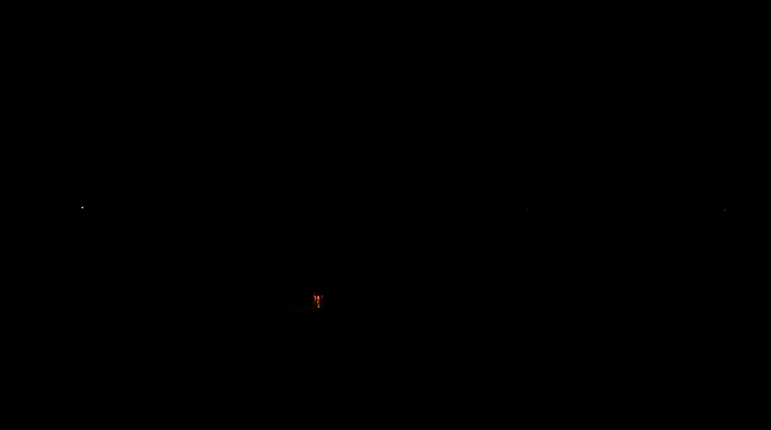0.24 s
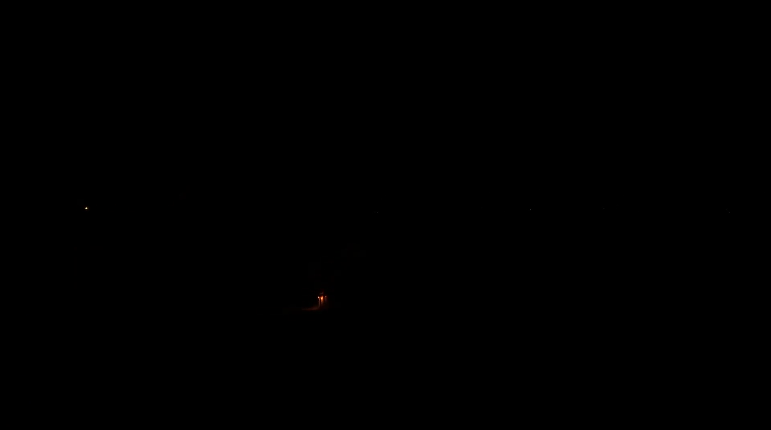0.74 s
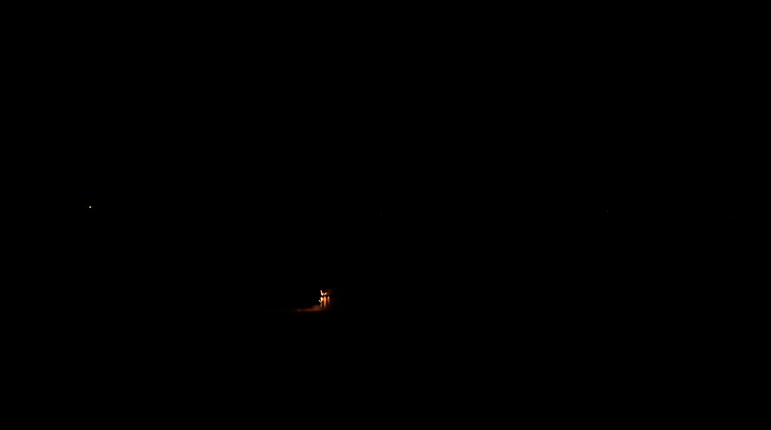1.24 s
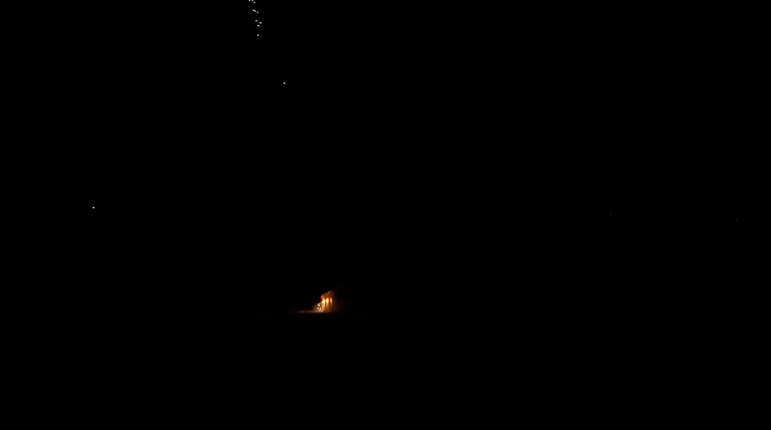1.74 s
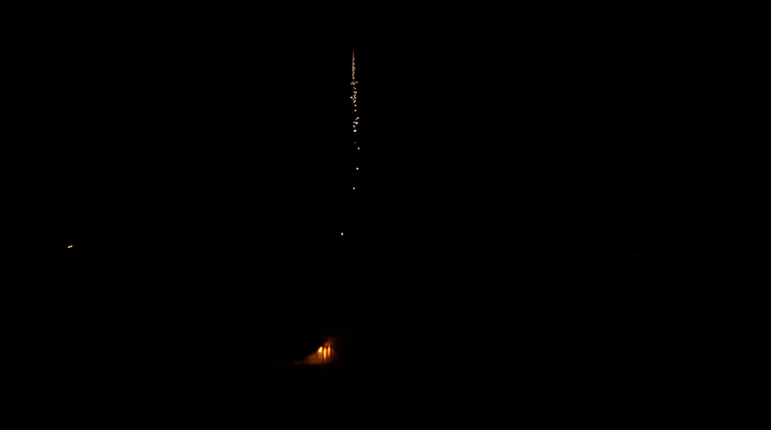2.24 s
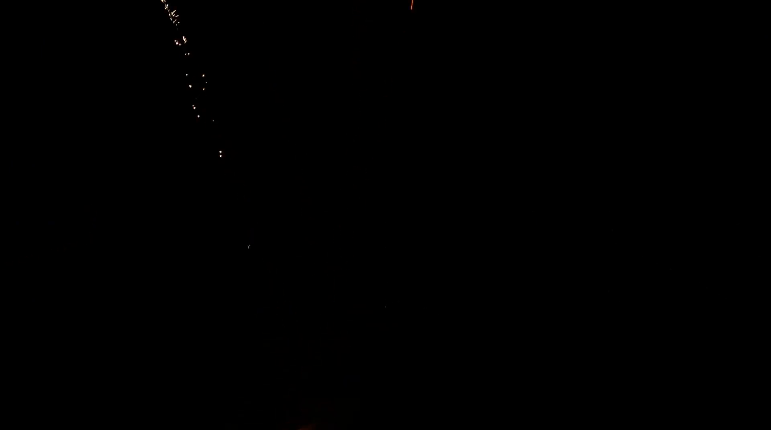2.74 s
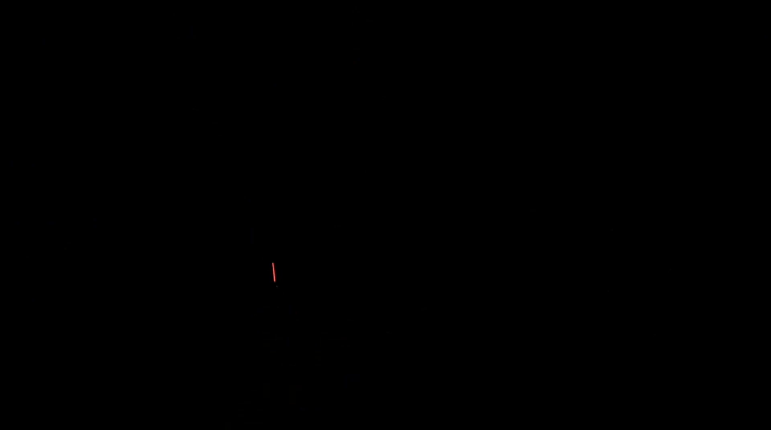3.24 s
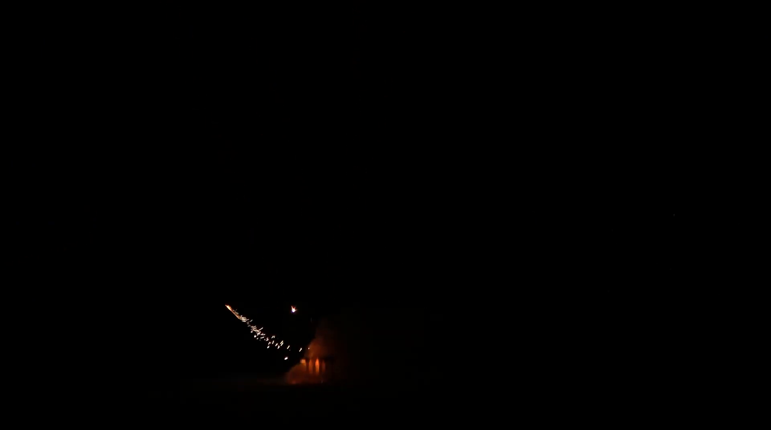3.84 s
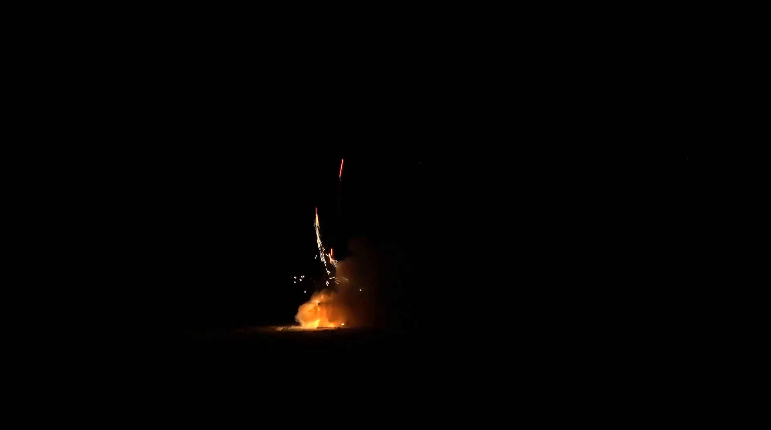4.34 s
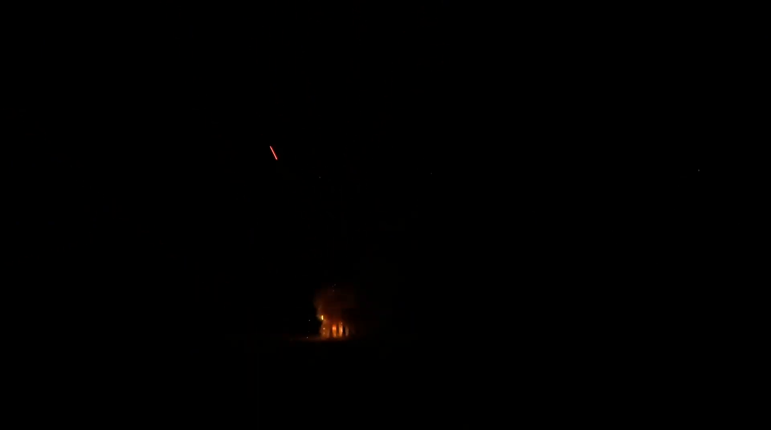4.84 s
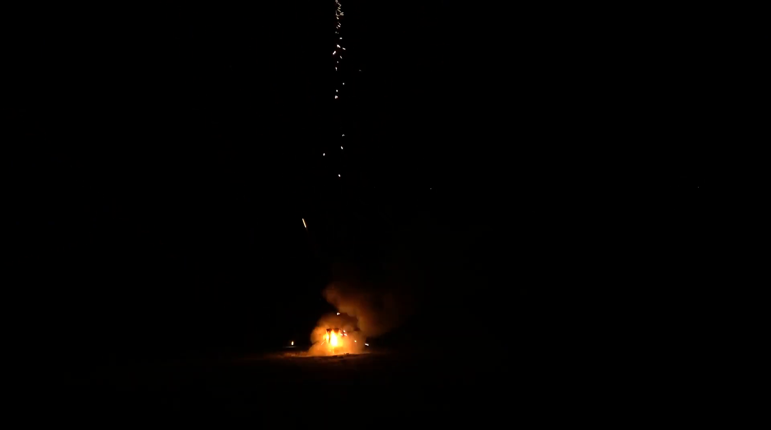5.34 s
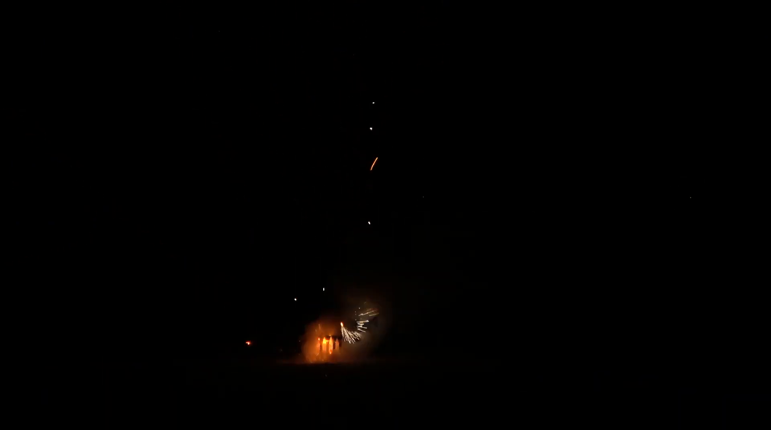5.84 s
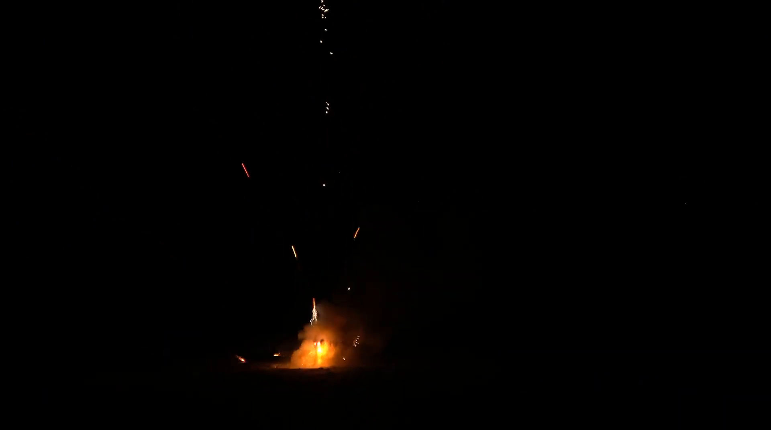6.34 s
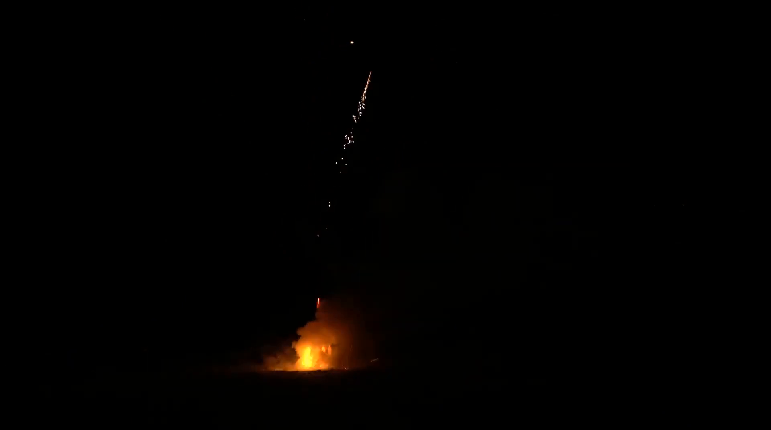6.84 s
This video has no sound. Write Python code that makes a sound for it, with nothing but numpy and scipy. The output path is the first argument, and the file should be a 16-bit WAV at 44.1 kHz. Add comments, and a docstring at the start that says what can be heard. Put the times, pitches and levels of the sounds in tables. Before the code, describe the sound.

In a quiet open field at night, one small rocket ignites with a puff and a piercing whistle that climbs briefly and sinks. A second follows, then launches pile into a shrill, detuned swarm with sizzling exhaust. Sharp cracks begin after two seconds and become frequent, with short ground bounces and sparse echoes. The microphones stand at some distance, with loud peaks pressed down.

```python
"""An open field at night: small whistling rockets fire, first one, then dozens at once.
Each whistle is a stack of partials that sputters alight and sinks in pitch as its tube burns hollow;
farther ones form a swarm, and the jets are coloured noise with spitting grains.
The rockets burst overhead in sharp cracks, built from a shock pulse, a snap and a thump.
Sparse echoes return from the ground, and a limiter after the microphones pushes down loud peaks."""
import sys
import numpy as np
from scipy import signal
from scipy.fft import rfft, irfft
from scipy.io import wavfile
from scipy.ndimage import uniform_filter1d, minimum_filter1d

SR = 44100
rng = np.random.default_rng(int(sys.argv[2]) if len(sys.argv) > 2 else 0)


def transcribe(signal):
    """Save signal, clipped to [-1, 1], as a 16-bit WAV file at the path in sys.argv[1]."""
    frames = np.atleast_2d(signal).T
    limited = np.clip(frames, -1, 1)
    pcm = np.round(limited * 32767).astype(np.int16)
    wavfile.write(sys.argv[1], SR, pcm)


N = 312228
TIME = np.arange(N) / SR

# How the volley thickens, levels relative before the final mix:
# (time [s], jet hiss [dB], overtone strength [dB], swarm of farther whistles [dB])
VOLLEY = [(.14, -40, -1, -81), (.5, -36, -11, -91), (1.02, -35, -13.5, -87), (1.3, -42.5, -1.5, -29.5),
          (1.65, -27, 0, -29.5), (2.3, -31.5, -1, -24.5), (2.5, -22.5, 7.5, -23.5), (3.0, -22.5, 1, -21.5),
          (3.5, -24, 3.5, -19.5), (5.6, -24, 1, -20), (6.4, -25, 2, -16.5), (7.08, -22.5, 0, -20)]


def gain_of(db):
    """Decibels to amplitude."""
    return 10 ** (np.asarray(db) / 20)


def evened(x):
    """Scales to rms 1."""
    return x / np.sqrt(np.mean(x ** 2) + 1e-20)


def read(points, hz):
    """Reads a spectrum table on a log-frequency axis."""
    table_hz, value = np.transpose(points)
    return np.interp(np.log(hz + 1), np.log(table_hz + 1), value)


def follow(rows, t):
    """The columns of a curve table at times t."""
    s, *columns = np.transpose(rows)
    return [np.interp(t, s, column) for column in columns]


def add(mix, s, sound):
    """Mixes a sound in at time s."""
    part = mix[max(round(s * SR), 0):][:len(sound)]
    part += sound[:len(part)]


def tint(x, spectrum):
    """Filters by a spectrum table."""
    gain = gain_of(read(spectrum, np.fft.rfftfreq(N, 1 / SR)))
    return irfft(rfft(x) * gain, N)


def noise(spectrum):
    """Noise of the given colour, at rms 1."""
    return evened(tint(rng.standard_normal(N), spectrum))


def wander(t, hz):
    """A random unsteadiness: straight lines between normal draws, hz of them a second."""
    return np.interp((t - t[0]) * hz, np.arange(8192), rng.standard_normal(8192))


def band(x, low_hz, high_hz):
    """A gentle band-pass."""
    edges_hz = [low_hz, min(high_hz, .45 * SR)]
    return signal.sosfilt(signal.butter(2, edges_hz, "band", fs=SR, output="sos"), x)


def night(level_db=-50.5):
    """The quiet night air: steady noise, weighted to the lows."""
    # Spectrum of the night: (frequency [Hz], relative level [dB])
    night_spectrum = [(25, -6), (130, 0), (600, -11), (3000, -17), (15000, -42)]
    return gain_of(level_db) * noise(night_spectrum)


def field(x, echoes_per_s=2000, build=0.0037):
    """Sparse echoes from the ground and things around, each band dying at its own speed."""
    # Echo decay of the field: (frequency [Hz], time to fall 60 dB [s])
    field_decay = [(200, 0.077), (2500, 1), (15000, 0.75)]
    taps = rng.standard_normal((2, SR)) * (rng.random((2, SR)) < echoes_per_s / SR)
    hz, t, z = signal.stft(taps, SR, nperseg=256)
    decay = gain_of(-60 * t / read(field_decay, hz)[:, None])
    onset = 1 - np.exp(-t / build)  # build in s
    tail = signal.istft(z * decay * onset, SR, nperseg=256)[1]
    tail = tail / np.linalg.norm(tail[0])
    mid, side = signal.fftconvolve(x[None], tail, axes=1)[:, :N]
    spread = 0.1 * side + .5 * band(side, 300, 490)  # the low echoes come from all around
    return mid + spread * np.array([[1], [-1]])


def whistle(t, hz, edge_db, sputter, low_db=0, drift=0.005615, jitter=0.00577, rasp=0.0121, flutter_db=5.0):
    """Pulsed burning in a tube: a stack of partials; a harsher flame is brighter and shivers more."""
    # Partials; the tube's weak lowest mode lies an octave under the pitch:
    # (multiple of the lowest mode [ratio], relative level [dB])
    partials = [(1, -18.5), (2, 3), (3, -14.5), (4, -12), (5, -20), (6, -13.5), (7, -20), (8, -18),
                (9, -23), (10, -23)]
    edge = gain_of(edge_db)
    harsh = np.minimum(edge, 1)
    # unsteadiness of pitch, as a fraction of it
    shiver = harsh * drift * wander(t, 70)
    shiver = shiver + (harsh * jitter + sputter) * wander(t, 600)
    shiver = shiver + rasp * wander(t, 2200)
    turn = np.exp(1j * np.pi * np.cumsum(hz * (1 + shiver)) / SR)  # the lowest mode, at half the pitch
    partial, tone = 1, 0
    for k, (_, db) in enumerate(partials):
        partial = partial * turn
        if k == 0:
            strength = gain_of(low_db)
        elif k == 1:
            strength = 1
        else:
            strength = edge
        tone = tone + gain_of(db) * partial.imag * strength
    flutter = gain_of(harsh * flutter_db * wander(t, 110.24))
    return np.sqrt(2) * tone * flutter


def swarm(count=46, start_hz=4300, end_hz=2650, burn=0.868, sink=.5):
    """Farther rockets leave at random within equal time slots, on one sinking curve at scattered pitches."""
    out, age = np.zeros(N), np.arange(0, burn, 1 / SR)  # burn and sink in s
    for k, (when, size) in enumerate(rng.random((count, 2))):
        s = 1 + (k + when) / count * (TIME[-1] - 1)
        sinking_hz = end_hz + (start_hz - end_hz) * np.exp(-(age / sink) ** 1.4)
        hz = sinking_hz * (.94 + .12 * size)
        _, edge_db, _ = follow(VOLLEY, s + age)
        add(out, s, whistle(age, hz, edge_db, 0.02163) * signal.windows.tukey(len(age), .12))
    return evened(out) * gain_of(follow(VOLLEY, TIME)[2])


def jets(spit_db=-18, spits_per_s=130, puff_decay_s=0.12):
    """The exhaust puffs at ignition and hisses in gusts; burning grains spit louder as the sky fills."""
    # Spectrum of the jet hiss: (frequency [Hz], relative level [dB])
    jet_spectrum = [(60, -19), (400, -10), (1500, 7.5), (2250, 8), (3100, 20.5), (4000, -51), (4800, 8.5),
                    (5700, 10), (7000, -3), (8800, 6.5), (11000, -19.5), (15000, -33)]
    # The first ignitions stand out as puffs of hiss: (time [s], relative level [dB], rise [s])
    puffs = [(0.136, -20.5, 0.009), (1.03, -13.5, 0.077)]
    hiss_db, _, swarm_db = follow(VOLLEY, TIME)
    flow = gain_of(hiss_db) * (TIME > puffs[0][0])
    for s, db, rise in puffs:
        age = np.maximum(TIME - s, 0)
        flow = flow + gain_of(db) * np.minimum(age / rise, 1) * np.exp(-age / puff_decay_s)
    gusts_db = 2.2 * wander(TIME, 40)
    grain_starts = rng.random(N) < spits_per_s / SR
    grains = grain_starts * gain_of(3.5 * np.minimum(rng.exponential(1, N), 3))
    softened = signal.lfilter([1], [1, -.8], grains)
    spits = evened(band(softened, 150, 16000))
    return noise(jet_spectrum) * flow * gain_of(gusts_db) + spits * gain_of(spit_db + swarm_db)


def burst(hz, snap_db=-13, thump_db=-14, thump_s=0.00084, clatter_db=-18, clatter_s=0.012,
          boom_db=-38, boom_hz=85, boom_decay_s=0.013):
    """A steep shock, a gritty snap, a thump and a scatter off the ground; deep ones carry more body."""
    t = np.arange(SR // 4) / SR
    swing, depth = np.pi * (hz * t - 1), (1000 / hz) ** 2
    shock = (1 - 2 * swing ** 2) * np.exp(-swing ** 2)
    grit, scatter = rng.standard_normal((2, len(t)))
    snap = gain_of(snap_db) * band(grit * np.exp(-t / 0.0071), 530, 4200)
    u = t / (thump_s * depth)  # a deeper burst thumps longer
    thump = gain_of(thump_db) * np.sin(2 * u) * np.exp(-u)
    clatter = gain_of(clatter_db) * band(scatter * np.exp(-t / clatter_s), 110, 1160)
    # the slow swing of air behind a deep burst
    air_swing = np.sin(2 * np.pi * boom_hz * t) * np.exp(-t / boom_decay_s)
    boom = gain_of(boom_db) * depth ** 2 * air_swing
    return shock + snap + depth * (clatter + thump + boom)


def cracks(level_db=2, bounce_db=1):
    """The rockets burst; the ground throws some of the shocks back a moment later."""
    # Bursts: (time of the shock's peak [s], relative level [dB], shock frequency [Hz],
    #          delay of the bounce off the ground [s], 0 = none)
    burst_list = [(2.1243, 10, 1335, 0.0013), (2.1582, -9.5, 1280, 0.00057), (2.2013, -8, 1450, 0.0015),
                  (2.9723, 4.5, 865, 0.0075), (3.4355, 4.5, 1358, 0.0028), (3.4802, 11.5, 1620, 0.0036),
                  (3.5802, 3.5, 900, 0.0099), (3.6711, 9.5, 1384, 0.0019), (4.044, 8.5, 1491, 0.00079),
                  (4.33, 1, 880, .0089), (4.4869, -6, 960, 0.0068), (4.5831, 3, 1576, 0),
                  (4.6717, 0, 1208, 0.012), (4.7991, 6, 1570, 0), (4.9769, 9.5, 1494, 0.0021),
                  (5.1101, 3.5, 1340, 0), (5.2079, -1.5, 1330, 0), (5.3177, 5.5, 1540, 0),
                  (5.4247, 6, 1186, 0.00064), (5.4745, -1, 1672, 0.004), (5.6109, 2, 1080, 0.0068),
                  (5.7113, 1.5, 720, 0.0063), (5.8284, 1.5, 962, .0064), (6.0425, 0, 1033, 0.0026),
                  (6.204, -14.5, 1020, 0.0011), (6.2837, -0.5, 940, 0.0054), (6.304, 1.5, 983, 0.0061),
                  (6.3419, 2, 894, 0.01), (6.5146, 1, 1667, 0), (6.6083, 8, 1442, 0.0042),
                  (6.7426, 5, 1374, 0), (6.7729, 4.5, 1158, 0), (6.7982, 0, 901, 0.016),
                  (6.8902, 0.5, 921, 0.0046), (6.9322, 0, 870, 0.0043)]
    out = np.zeros(N)
    for s, db, hz, bounce in burst_list:
        start = s - 1 / hz  # the shock peaks 1 / hz after its start
        add(out, start, gain_of(db + level_db) * burst(hz))
        if bounce > 0:
            add(out, start + bounce, gain_of(db + level_db + bounce_db) * burst(hz))
    return out


def screech():
    """A motor that never locks: its pitch scatters into a hoarse band."""
    # A late, ragged motor high above the others: (time [s], pitch [Hz], relative level [dB])
    screech_curve = [(6.55, 5500, -26.5), (6.92, 5500, -23), (7.08, 5470, -27)]
    hz, db = follow(screech_curve, TIME)
    fade_in = np.clip((TIME - screech_curve[0][0]) * 20, 0, 1)
    return gain_of(db) * fade_in * whistle(TIME, hz, -8, sputter=.055)


def glide(start, burn, climb, top_hz, last_hz, sink, level_db, swell_db,
          climb_hz_per_s=2500, arch_s=.03, waver=.004, waver_hz=30.02, surge_db=1.86, surge_hz=16.4):
    """Pressure builds and the note climbs, rounds off, then sinks and flattens as the tube burns hollow."""
    age = np.arange(0, burn, 1 / SR)
    since_top = np.hypot(np.maximum(age - climb, 0), arch_s) - arch_s
    hollow = 1 - np.exp(-since_top / sink)
    hz = top_hz + (last_hz - top_hz) * hollow / hollow[-1]
    hz = hz - climb_hz_per_s * np.maximum(climb - age, 0)
    # a tumbling rocket wavers in pitch and loudness
    db = level_db + swell_db * (age / burn - .5) + surge_db * wander(age, surge_hz)
    return start + age, hz * (1 + waver * wander(age, waver_hz)), db


def early_flight(curve, dip_db=-13, dip_s=.008):
    """Times, pitch and level of one of the first two whistles, with its brief dips."""
    # Brief dips in the first two whistles, most where the ground reflection cancels the sound: (time [s])
    dip_times = [0.579, 1.401, 1.493, 1.544, 1.594, 1.644]
    t = np.arange(curve[0][0], curve[-1][0], 1 / SR)
    hz, db = follow(curve, t)
    dips = sum(np.exp(-((t - s) / dip_s) ** 2) for s in dip_times)
    return t, hz, db + dip_db * dips


def motor(t, hz, db, sputter, settle, rise=0.002, fade=0.021, low_slope=0.073, lowest_db=3,
          pure_start_db=-6, harshen_s=0.16, overtone_wander_db=4, overtone_wander_hz=7.03):
    """A near whistle sputters, locks onto a fairly pure note, then grows harsher until it fades."""
    age = t - t[0]
    # the overtones waver at random in strength
    edge_db = follow(VOLLEY, t)[1] + overtone_wander_db * wander(age, overtone_wander_hz)
    edge_db = edge_db + pure_start_db * np.exp(-age / harshen_s)
    gate = np.minimum(age / rise, 1) * np.minimum((t[-1] - t) / fade, 1)  # rise and fade in s
    igniting = np.exp(-(age / settle) ** 2)
    # a strong, settled motor wakes the lowest mode
    low_db = lowest_db + low_slope * (db.mean() + 20) - 20 * igniting
    return gain_of(db) * gate * whistle(t, hz, edge_db, sputter * igniting, low_db)


def near_whistles(opener_db=1.0, follower_db=0, later_db=0.5):
    """All the near whistles, each glide from its own start."""
    # The first two, heard almost alone, lurch in pitch as they climb:
    # (time [s], whistle pitch [Hz], relative level [dB])
    opener = [(0.14, 3110, -19.5), (0.168, 3680, -14), (0.242, 3962, -12.5), (0.496, 3285, -7),
              (0.57, 3313, -10), (0.606, 3193, -7.5), (0.748, 3093, -4.5), (0.88, 3047, -6.5),
              (0.96, 2899, -3.5), (1.042, 3008, -9.5), (1.084, 2965, -11), (1.2, 3340, -26)]
    follower = [(1.025, 4010, -25), (1.046, 4385, -14), (1.1, 4205, -25), (1.13, 3844, -12),
                (1.31, 3420, -15), (1.335, 3130, -14.5), (1.471, 2983, -12.5), (1.589, 2980, -14),
                (1.91, 2680, -20)]
    # The whistle glides after them; some rows continue an earlier glide:
    # (start [s], length [s], climb [s], top pitch [Hz], last pitch [Hz],
    #  sink time [s], relative level [dB], swell over the length [dB])
    later_glides = [(1.13, 1.3, 0.082, 4124, 3101, .47, -21, -2),
                    (1.41, 0.56, .08, 4280, 3208, 1.4, -26.5, 0),
                    (1.72, 0.31, 0.045, 4140, 3266, 0.24, -21.5, 11),
                    (1.97, 0.46, 0.0047, 2976, 2750, 0.21, -19.5, -3.5),
                    (2.285, .135, .03, 4390, 4080, 1.5, -16.5, 2),
                    (2.41, 1.16, .005, 3770, 2406, 0.5, -23, -10.5),
                    (2.409, .95, 0.0045, 3280, 2713, 0.58, -22.5, -5),
                    (2.66, 1.12, 0.026, 3475, 2880, .85, -26.5, 2),
                    (3.18, 0.51, .005, 4320, 3047, .3, -25.5, 7),
                    (3.29, .4, 0.066, 4092, 3212, 0.42, -23, 4),
                    (3.58, 0.42, 0.019, 4360, 3750, 1.95, -24.5, -1),
                    (3.78, 0.23, 0.032, 3630, 2640, .1, -22, 17),
                    (4.011, 0.41, 0.0057, 2900, 2472, 0.96, -32, -3),
                    (4.0, 0.52, 0.33, 4000, 3866, 0.67, -23, -9.5),
                    (4.11, 1.03, 0.056, 4383, 2522, .43, -25, -5),
                    (4.231, 0.16, 0.0051, 4500, 3660, 0.93, -28, -7),
                    (4.33, 1.63, 0.0049, 3315, 2374, 1.9, -27.5, -14.5),
                    (4.56, .52, .12, 4470, 4145, 2, -26.5, -5),
                    (4.88, 0.64, 0.057, 4357, 3273, .58, -22.5, 2.5),
                    (5.14, 0.62, 0.0055, 3805, 2858, 0.097, -24, -10),
                    (5.38, 0.6, 0.078, 4123, 3106, 0.4, -25.5, -1),
                    (5.452, .58, 0.015, 3790, 2853, .27, -22, 10),
                    (5.86, 0.87, .02, 4082, 2479, 0.21, -26.5, -12),
                    (6.1, 1.02, 0.062, 4246, 2673, 0.41, -26, -3),
                    (6.4, 0.72, 0.034, 4290, 2940, 0.21, -25.5, -7),
                    (6.6, 0.45, 0.013, 4113, 3650, .12, -29.5, 10)]
    first_sputter, first_settle_s = 0.063, 0.079  # pitch scatter as the first one lights (fraction), its length
    sputter, settle_s = .012, 0.034  # the same for the others
    out = np.zeros(N)
    add(out, opener[0][0], gain_of(opener_db) * motor(*early_flight(opener), first_sputter, first_settle_s))
    add(out, follower[0][0], gain_of(follower_db) * motor(*early_flight(follower), sputter, settle_s))
    for row in later_glides:
        add(out, row[0], gain_of(later_db) * motor(*glide(*row), sputter, settle_s))
    return out


def scene():
    """Whistles, jets and bursts over a quiet night, each leaning slightly to one side."""
    # Colour of the whistles at the microphones: (frequency [Hz], level [dB])
    whistle_colour = [(1400, -12.5), (1850, 4), (2700, -1.5), (8700, -2), (15000, -16.5)]
    whistles = tint(near_whistles() + swarm() + screech(), whistle_colour)
    hiss, bursts = jets(), cracks()
    # left and right gains in dB
    direct = whistles * gain_of([[-.6], [.6]])
    direct = direct + hiss * gain_of([[.2], [-.2]])
    direct = direct + bursts * gain_of([[.7], [-.7]])
    echoes = field(gain_of(-13.5) * whistles + gain_of(-24.0) * hiss + gain_of(-14.5) * bursts)
    return direct + echoes + night()


def record(dry, ceiling_db=-4.0, recover_db_per_s=750, edge_hz=15750):
    """A fast limiter dips both channels together at peaks over the ceiling; then a low-pass."""
    over_db = np.maximum(20 * np.log10(abs(dry).max(0) + 1e-9) - ceiling_db, 0)
    fall = TIME * recover_db_per_s
    held_db = np.maximum.accumulate(over_db + fall) - fall  # jumps up at once, recovers steadily
    cut_db = uniform_filter1d(minimum_filter1d(-held_db, size=120), size=120)
    low_pass = signal.firwin(511, edge_hz, window=("kaiser", 9), fs=SR)
    return signal.oaconvolve(dry * gain_of(cut_db), low_pass[None], "same")


dry = scene()
out = record(dry)
transcribe(out)
```